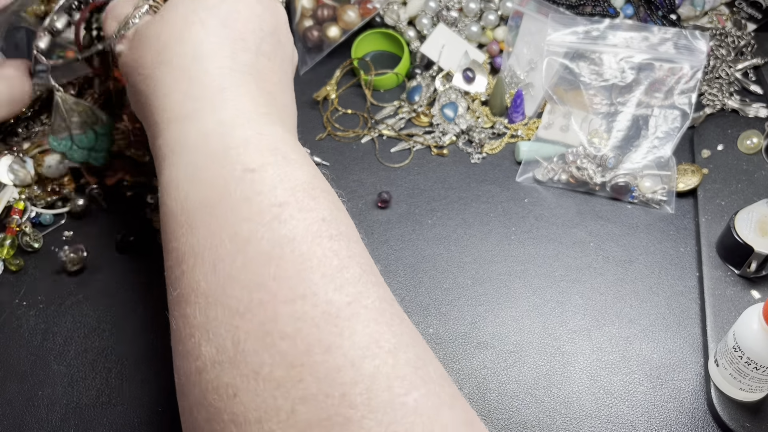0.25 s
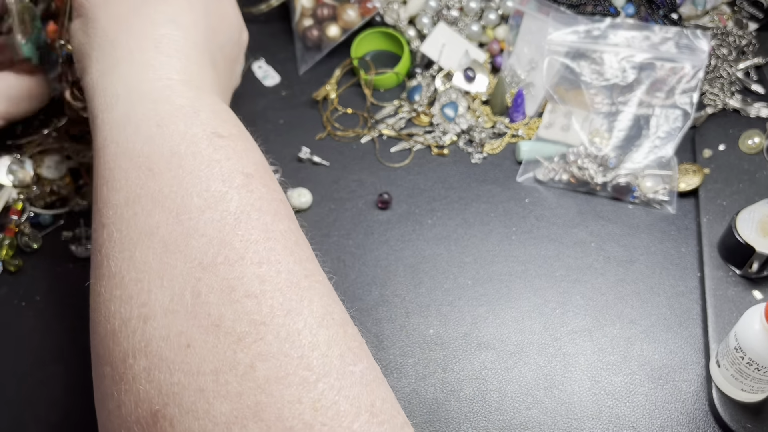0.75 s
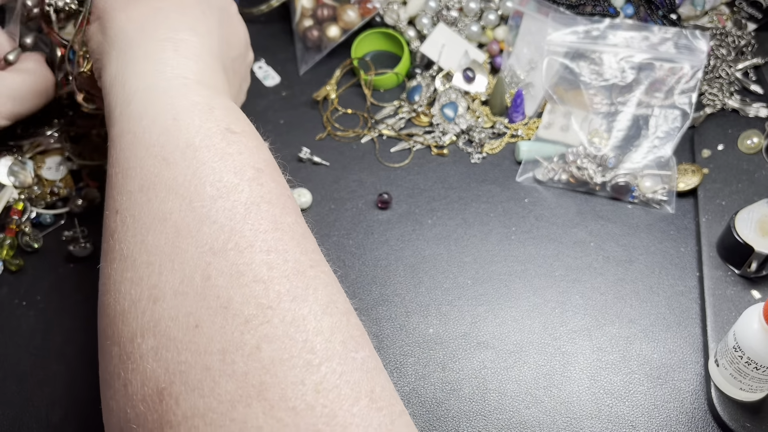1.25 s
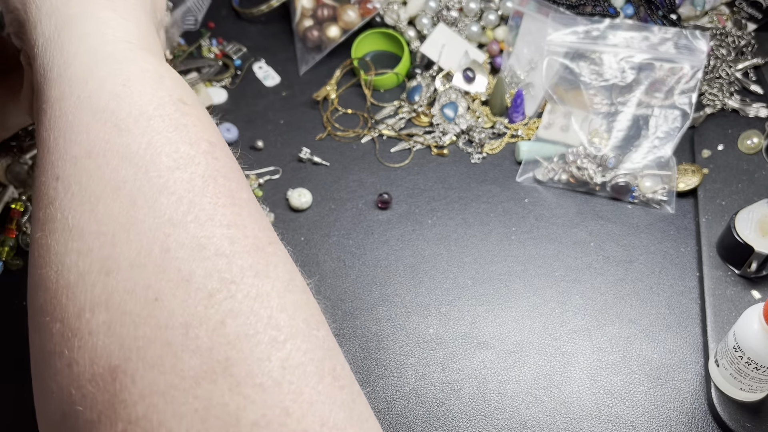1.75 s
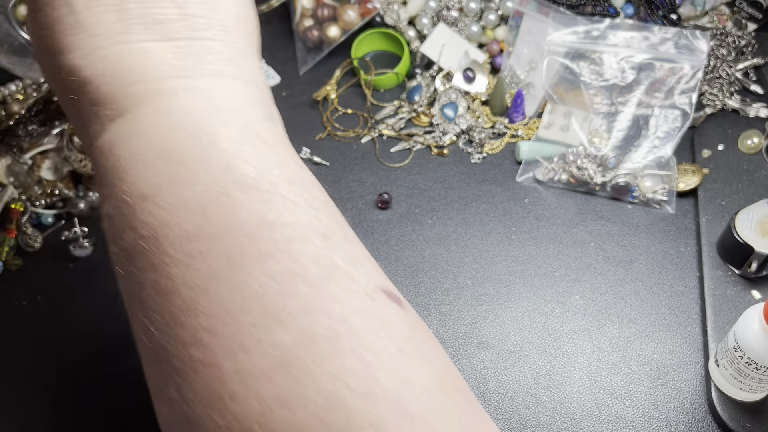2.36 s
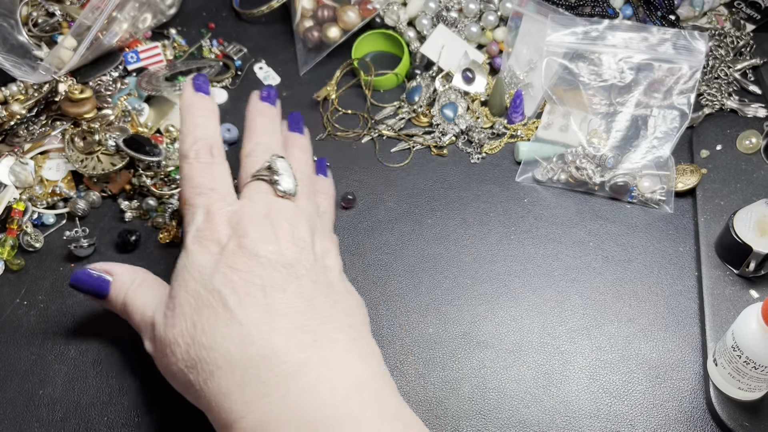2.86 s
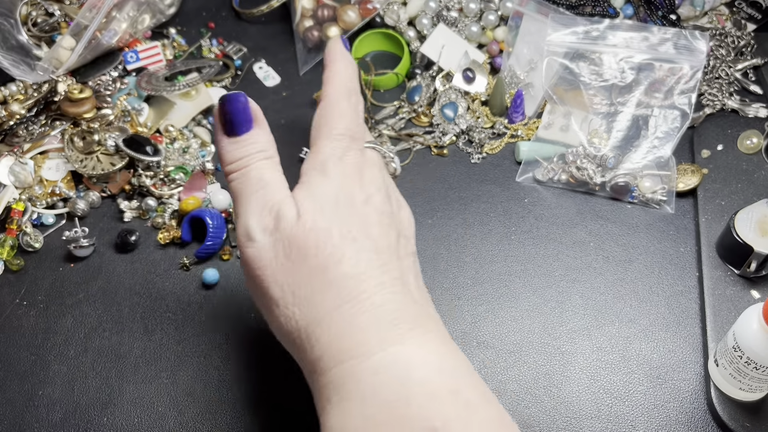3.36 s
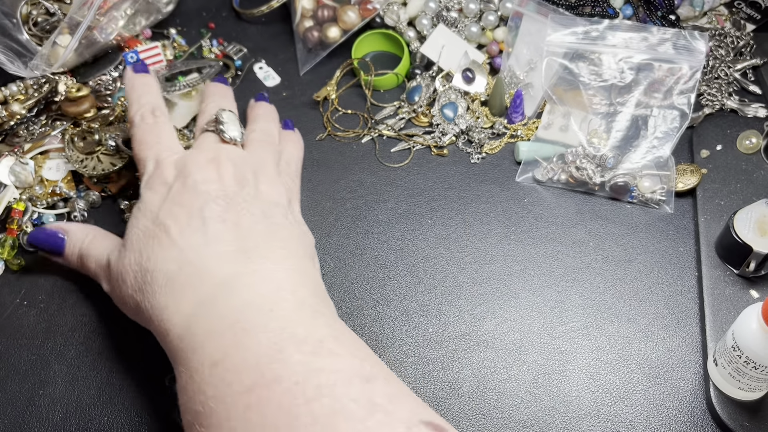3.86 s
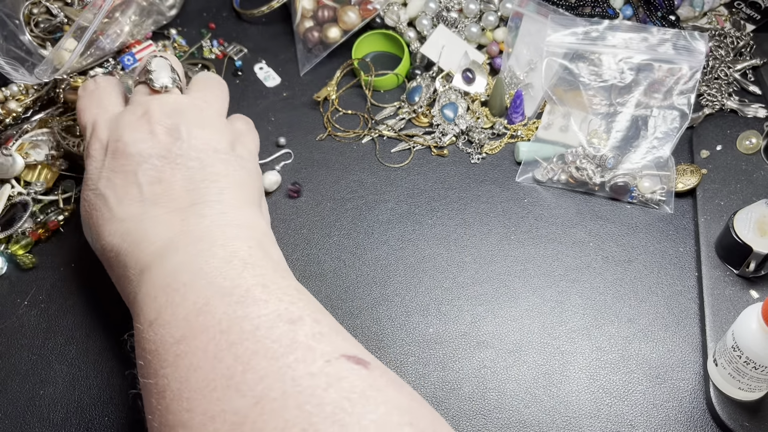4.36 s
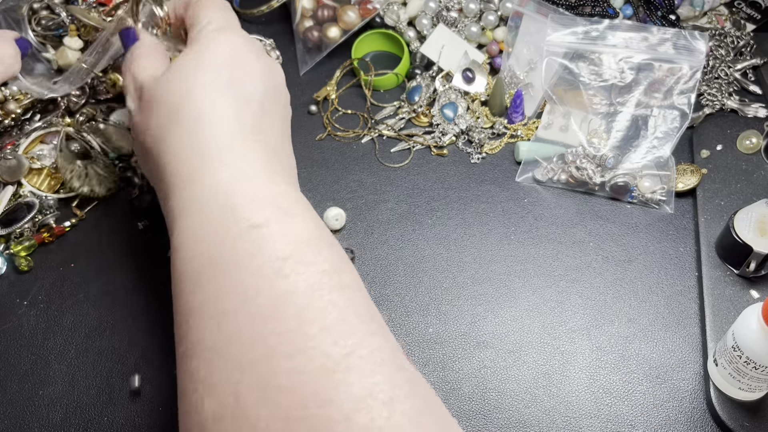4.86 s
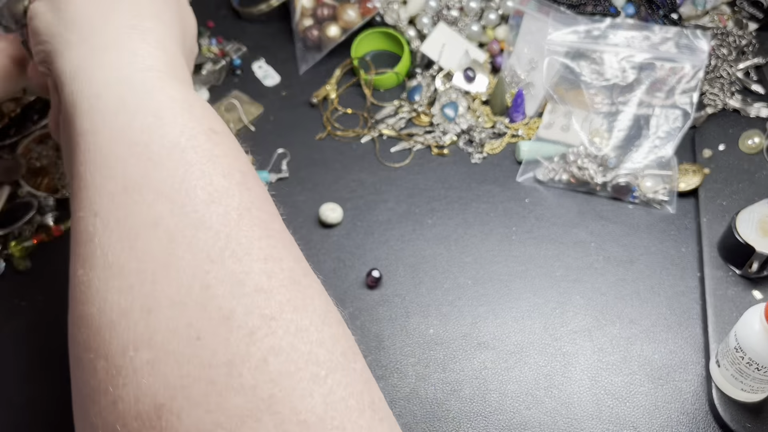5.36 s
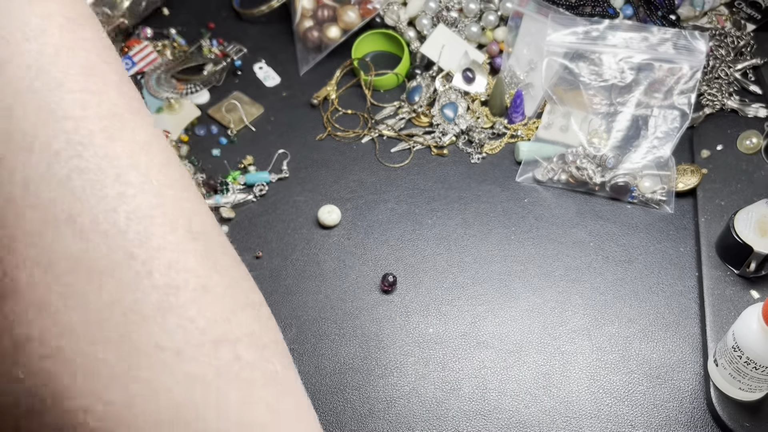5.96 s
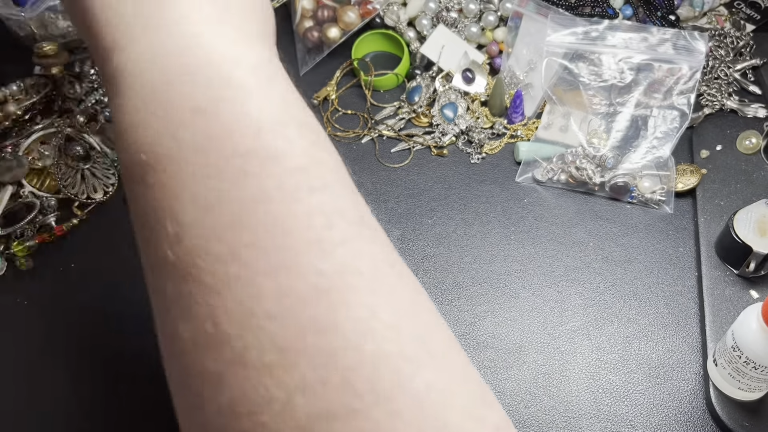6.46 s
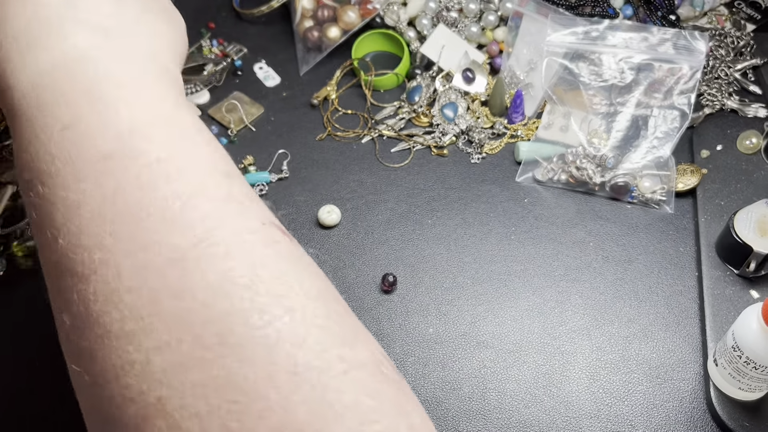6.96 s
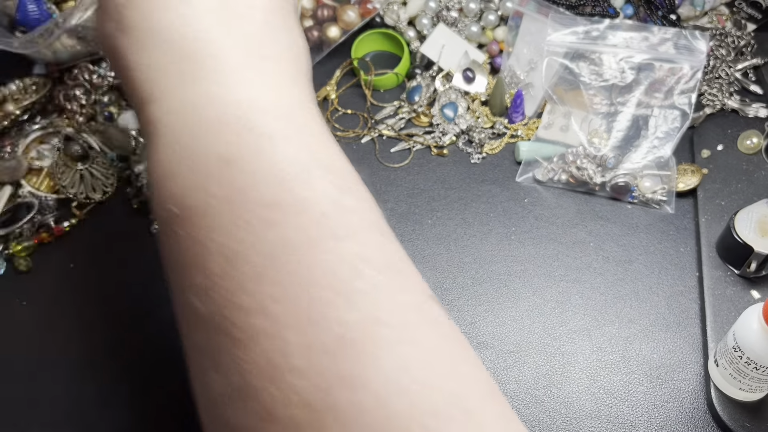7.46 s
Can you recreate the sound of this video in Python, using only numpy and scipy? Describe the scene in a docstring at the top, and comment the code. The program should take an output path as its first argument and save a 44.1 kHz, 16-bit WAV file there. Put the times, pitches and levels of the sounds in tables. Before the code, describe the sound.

Close stereo microphone indoors. A hand stirs a pile of loose jewelry on a padded desk mat: fine chains rustle, plastic beads rattle and charms jingle brightly, strongest before two seconds. A quieter gap follows with faint skin hiss and a soft landing. Raking resumes, swells again to a sharp rattle, then thins to single clacks and clinks over a low room hum.

```python
"""Raking through costume jewelry

A hand rakes through a heap of costume jewelry on a padded desk mat, close to a small stereo microphone.
One effort curve drives rustling chains, rattling beads and jingling charms, as random touches ring modes.
Single pieces clink, clack, snap and chatter as decaying modes and noise bursts; the desk top knocks.
Between handfuls filtered noise hisses as the hand slides over the mat; a low hum and rush fill the room."""
import sys
import numpy as np
from scipy import signal
from scipy.fft import rfft, irfft, next_fast_len
from scipy.io import wavfile
from scipy.ndimage import uniform_filter1d

SR = 44100
rng = np.random.default_rng(int(sys.argv[2]) if len(sys.argv) > 2 else 0)


def waveform_to_disk(signal):
    """Save audio, clipped to [-1, 1], as 16-bit WAV at the path in sys.argv[1]."""
    frames = np.transpose(np.atleast_2d(signal))
    scaled = np.clip(frames, -1, 1) * 32767
    samples = np.round(scaled).astype(np.int16)
    wavfile.write(sys.argv[1], SR, samples)


N = 339570
TIME = np.arange(N) / SR
CUTOFF_HZ = 16100
# woody mode of the desk top: pitch and 60 dB decay time
DESK_HZ, DESK_T60_S = 495.6, 0.037

# spectral density of small metal pieces: [f/Hz, level/dB per Hz]
METAL_SPECTRUM = [(300, -11), (2000, -14.5), (3400, -18.5), (4300, -15), (6500, -8), (9000, -5), (10400, 2),
                  (11300, -6.5), (12500, -16.5), (14000, -22.5), (16000, -35)]
# spectral density of plastic beads: [f/Hz, level/dB per Hz]
BEAD_SPECTRUM = [(60, -9.5), (300, 3), (500, 2.5), (750, -2.5), (1600, -2), (2500, -3), (4000, -7.5),
                 (8000, -0.5), (16000, -81.5)]
# spectral density of fine sliding, skin on the mat or thin chains on each other: [f/Hz, level/dB per Hz]
SLIDING_SPECTRUM = [(1000, -18.5), (3000, -14), (5500, -11), (10500, -7.5), (12000, -15), (16000, -59)]
# how hard the hand stirs, one curve for each rake through the heap: [t/s, level/dB]
RAKE_EFFORTS = [
    [(0.0, -39), (0.2, -42), (0.302, -57), (0.41, -48), (0.462, -40), (0.534, -48), (0.66, -61.5)],
    [(0.66, -56), (0.758, -46), (1.1, -53), (1.37, -39), (1.48, -44), (1.6, -35), (1.88, -32), (2.152, -36),
     (2.22, -50), (2.45, -70)],
    [(3.66, -70), (3.78, -51), (3.99, -39.5), (4.17, -41), (4.28, -37), (4.396, -38), (4.57, -45),
     (4.66, -36), (4.78, -53)],
    [(4.78, -51.5), (4.86, -38), (4.99, -55), (5.07, -36), (5.18, -56), (5.3, -57)],
    [(5.3, -55.5), (5.44, -39), (5.534, -44), (5.62, -35), (5.764, -29), (5.946, -36), (6.18, -59)],
]


def from_db(db):
    """Amplitude ratio: 20 dB is a factor of ten."""
    return 10 ** (np.asarray(db) / 20)


def rms_one(x):
    """Normalisation: the mean power becomes 1."""
    return x / np.sqrt(np.mean(x ** 2) + 1e-20)


def fade(t, t60):
    """Exponential decay: the level falls 60 dB in t60 seconds."""
    return np.exp(-np.log(1000) * t / t60)


def swell(middle_s, length_s):
    """Gaussian envelope: a smooth rise and fall of height 1."""
    return np.exp(-(2 * (TIME - middle_s) / length_s) ** 2 * 2)


def drift(rate):
    """Slow random modulation: normal values of spread 1, `rate` a second, joined by straight lines."""
    knots = rng.standard_normal(2 ** 11)
    return np.interp(TIME * rate % len(knots), np.arange(len(knots)), knots)


def butterworth(x, order, hz, kind="low"):
    """Butterworth filter: passes one side of a corner frequency without ripple."""
    return signal.sosfilt(signal.butter(order, hz, kind, fs=SR, output="sos"), x)


def coloured(x, spectrum):
    """Minimum-phase filtering: folding the cepstrum gives a causal response with the wanted spectrum."""
    size = 2 ** 11
    table_hz, table_db = np.transpose(spectrum)
    bin_hz = np.arange(size // 2 + 1) * SR / size
    gain_db = np.interp(np.log(bin_hz + 1), np.log(table_hz), table_db)
    cepstrum = irfft(np.log(from_db(gain_db)))
    cepstrum[1:size // 2] *= 2
    cepstrum[size // 2 + 1:] = 0
    response = irfft(np.exp(rfft(cepstrum)))
    return signal.fftconvolve(x, response)[:len(x)]


def ring(clicks, hz, t60):
    """Damped resonator: a unit click sets a decaying sine of height 1 ringing."""
    radius = from_db(-60 / (t60 * SR))
    angle = 2 * np.pi * min(hz, SR * .45) / SR
    poles = [1, -2 * radius * np.cos(angle), radius * radius]
    return signal.lfilter([0, np.sin(angle)], poles, clicks + 1e-18)


def contacts(per_s, spread_db, size):
    """Random impact process: touches of either sign, many weak and a few strong."""
    strength = from_db(spread_db * np.minimum(rng.exponential(1, size), 3.5))
    struck = rng.random(size) < per_s / SR
    return struck * strength * rng.choice([-1, 1], size)


def add(out, s, sound):
    """Superposition: mix a sound in at time s."""
    start = max(round(s * SR), 0)
    out[start:start + len(sound)] += sound[:N - start]


def background(apart_db=-20):
    """Steady hum plus broadband rush: both dip briefly, the hum and the bass least."""
    # spectral density of the rush: [f/Hz, level/dB per Hz]
    rush_spectrum = [(20, -27.5), (55, 0), (100, -6.5), (300, -11), (500, -24), (1200, -41), (16000, -61.5)]
    # middles of the brief dips: [t/s]
    dip_times = [2.98, 6.58]
    hum_hz, hum_db, rush_db = 60, -63, -59.5
    dip_s, dip_db, bass_dip_share, bass_below_hz = 0.26, -13, 0.15, 130

    both, left, right = [rms_one(coloured(white, rush_spectrum)) for white in rng.standard_normal((3, N))]
    rush = both + from_db(apart_db) * np.array([left, right])
    bass = signal.sosfiltfilt(signal.butter(2, bass_below_hz, fs=SR, output="sos"), rush)
    hum = from_db(hum_db) * np.sqrt(2) * np.sin(2 * np.pi * hum_hz * TIME)
    dip = from_db(dip_db * sum(swell(s, dip_s) for s in dip_times))
    low = hum + from_db(rush_db) * bass
    high = from_db(rush_db) * (rush - bass)
    return dip ** bass_dip_share * low + dip * high


def stirring(smoothing_s=0.051):
    """Effort envelope in dB against a hard stir: between rakes the heap lies nearly still."""
    # light touches that nudge the last pieces: [t/s, level/dB]
    nudge_effort = [(6.19, -56.5), (6.5, -66.5), (6.6, -96), (6.934, -51), (7.1, -73.5), (7.288, -54),
                    (7.4, -72)]
    hard_stir_db, fidget_db, fidget_per_s = -26, 1.28, 30

    curves = [np.interp(TIME, *np.transpose(rows), left=-130, right=-130)
              for rows in [*RAKE_EFFORTS, nudge_effort]]
    smooth = uniform_filter1d(np.max(curves, axis=0), int(smoothing_s * SR) + 1)
    # the fingers push unevenly
    return smooth - hard_stir_db + fidget_db * drift(fidget_per_s)


def touch_rate(level_db, scale_per_s):
    """Contact density: harder stirring sets more pieces moving at once."""
    return scale_per_s * (0.14 + from_db(.5 * (level_db - level_db.max())))


def loose_pieces(per_s, spread_db, clump_db, low_hz, high_hz, t60, tick, count):
    """Modal excitation: clumped touches tick drily and each rings its own mix of the heap's many modes."""
    clump = from_db(clump_db * np.tanh(drift(70)))
    clicks = contacts(per_s, spread_db, N) / np.sqrt(per_s) * clump
    touches = np.flatnonzero(clicks)
    jitter_hz = rng.uniform(-.5, 0.56, count) * (high_hz - low_hz) / count
    rings = 0
    for hz in np.linspace(low_hz, high_hz, count) + jitter_hz:
        share = np.zeros(N)
        # cubed chance: most touches barely move a given mode, a few move it strongly
        share[touches] = rng.standard_normal(len(touches)) ** 3
        rings = rings + ring(clicks * share, hz, t60)
    return rms_one(rings) + tick * rms_one(clicks)


def rustle(level_db):
    """Dense impacts of small parts: chain links and seed beads slide over each other in short high rings."""
    links = loose_pieces(touch_rate(level_db, 2200), spread_db=4.3, clump_db=6.5,
                         low_hz=3870, high_hz=13560, t60=0.008, tick=0.71, count=56)
    return rms_one(coloured(links, METAL_SPECTRUM))


def rattle(level_db, desk_db):
    """Damped impacts: larger plastic beads jostle on the mat and drive the desk top's woody mode."""
    beads = loose_pieces(touch_rate(level_db, 420), spread_db=2.5, clump_db=6,
                         low_hz=574, high_hz=4634, t60=0.021, tick=0.79, count=32)
    beads = rms_one(coloured(beads, BEAD_SPECTRUM))
    desk = rms_one(ring(beads, DESK_HZ, DESK_T60_S))
    return beads + from_db(desk_db - 15.0) * desk


def jingle(per_s=260, t60=0.036):
    """Lightly damped modes: random touches ring the charms, which take turns to be loud."""
    # ringing modes of the charms: [f/Hz, level/dB]
    charm_modes = [(5733, -12), (7025, -10.5), (7677, -2.5), (7860, -0.5), (8040, -1), (10196, 4),
                   (10632, 0), (10982, -0.5), (12177, -7)]
    spread_db, turns_db = 3, 9

    out = np.zeros(N)
    for hz, db in charm_modes:
        turn = from_db(turns_db * np.tanh(drift(25)))
        out += from_db(db) * ring(turn * contacts(per_s, spread_db, N), hz, t60)
    return rms_one(out)


def heap():
    """Common excitation: one effort moves all; beads stir at a light touch, charms only at a hard one."""
    # what the hand meets on each rake, against the usual mix:
    # [charms level/dB, sliding chains level/dB, beads level/dB, desk level/dB]
    rake_mix = [(7.5, 3, -1, -1.5), (3.5, -9.5, 0.5, -3), (2, 7.5, -2, 7), (-15, -11, -1, 4),
                (-7, -10.5, 2, -6)]
    effort = stirring()
    rake_starts = [rows[0][0] for rows in RAKE_EFFORTS]
    rake = np.maximum(np.searchsorted(rake_starts, TIME) - 1, 0)
    more_charms_db, more_slither_db, more_beads_db, desk_db = np.array(rake_mix)[rake].T

    # level at a hard stir in the usual mix, plus the dB gained for each dB of effort
    chains_db = -24 + 0.8 * effort
    beads_db = -42.5 + 0.5 * effort + more_beads_db
    charms_db = -14 + 2.32 * effort + more_charms_db
    slither_db = -36.5 + 0.97 * effort + more_slither_db

    chains = from_db(chains_db) * rustle(chains_db)
    beads = from_db(beads_db) * rattle(beads_db, desk_db)
    charms = from_db(charms_db) * jingle()
    slither = from_db(slither_db) * rms_one(coloured(rng.standard_normal(N), SLIDING_SPECTRUM))
    return chains + beads + charms + slither


def crack(colour, rise_s, t60):
    """High modal density: the many short-lived modes of a contact merge into a noise burst."""
    t = TIME[:SR // 5]
    # the burst swells in briefly before it decays
    envelope = fade(t, t60) * (1 - np.exp(-t / rise_s))
    burst = coloured(rng.standard_normal(len(t)) * envelope, colour)
    # the energy of 3 ms at rms 1
    return burst / np.sqrt(np.sum(burst ** 2) / (.003 * SR))


def strike(hz, colour, rise_s, ring_t60, ring_db, crack_t60, crack_db):
    """Modal impact: a crack and a cluster of modes round the pitch, of which the pitch rings longest."""
    t = TIME[:SR // 5]
    cluster_hz = hz * rng.uniform(.87, 1.1, (6, 1))
    phases = rng.uniform(0, 2 * np.pi, (6, 1))
    cluster = np.sin(2 * np.pi * cluster_hz * t + phases).sum(0)
    modes = np.sin(2 * np.pi * hz * t) * fade(t, ring_t60) + .5 * cluster * fade(t, ring_t60 / 2)
    ringing = from_db(ring_db) * modes * (1 - np.exp(-t / rise_s))
    return from_db(crack_db) * crack(colour, rise_s, crack_t60) + ringing


def clinks(bounce_per_s=1500, bounce_db=-14, lowest_hz=4800):
    """Impact and settling: a piece strikes or a link snaps free, then its neighbours patter ever more weakly."""
    # metal and glass pieces that strike and ring: [t/s, level/dB, f/Hz]
    ringing_blows = [(0.4236, -17, 7080), (0.4595, -5, 11230), (0.9194, -20.5, 6300), (1.149, -18, 7750),
                     (1.336, -14.5, 10100), (1.4193, -13, 8170), (1.4931, -11, 10900), (1.6392, -9, 10470),
                     (1.662, -5, 9840), (1.738, -13, 7100), (1.7682, -6.5, 7750), (2.296, -34.5, 6560),
                     (2.501, -33, 6690), (5.709, -7.5, 10200), (5.9501, -13.5, 10400), (7.252, -11.5, 6650),
                     (7.2609, -1.5, 10900)]
    # links and clasps that snap past each other, dry and without a note: [t/s, level/dB]
    dry_snaps = [(0.224, -30), (0.392, -29), (0.4914, -21), (0.732, -27.5), (0.763, -22), (1.0332, -27),
                 (1.436, -21.5), (2.028, -20.5), (3.075, -50), (3.09, -46), (3.943, -26), (4.1, -24),
                 (4.607, -25), (4.837, -15), (4.855, -22.5), (5.0, -30.5), (5.381, -33), (5.4229, -19.5),
                 (5.481, -21.5), (5.659, -22), (5.769, -13.5), (5.84, -15.5), (5.881, -18), (5.91, -21),
                 (6.2048, -21), (6.2626, -25), (6.746, -47), (6.964, -34)]
    settle_t60_s = 0.075

    blows = []
    for s, db, hz in ringing_blows:
        blow = strike(hz, METAL_SPECTRUM, rise_s=0.0033, ring_t60=0.024, ring_db=4.5,
                      crack_t60=0.0069, crack_db=-9.0)
        blows.append((s, db, blow))
    for s, db in dry_snaps:
        blows.append((s, db, crack(METAL_SPECTRUM, rise_s=.001, t60=.01)))

    out = np.zeros(N)
    for s, db, blow in blows:
        touches = rms_one(coloured(contacts(bounce_per_s, 7, len(blow)), METAL_SPECTRUM))
        patter = touches * fade(TIME[:len(blow)], settle_t60_s)
        add(out, s, from_db(db) * (blow + from_db(bounce_db) * patter))
    # such small pieces radiate little bass
    return butterworth(out, 2, lowest_hz, "high")


def clacks(rebound_s=.006, rebound_db=-7, lowest_share=0.4, highest_share=3.8, ring_cycles=32):
    """Size sets pitch: beads knock hollowly with a quick rebound, and the hand lands softly."""
    # beads that knock together or on the mat, the larger the lower: [t/s, level/dB, f/Hz]
    bead_knocks = [(0.492, -45, 4450), (0.602, -36, 2440), (0.693, -41, 2150), (0.734, -36.5, 1680),
                   (0.787, -33.5, 2260), (0.82, -32.5, 2150), (0.877, -46, 1480), (1.04, -38.5, 2250),
                   (1.583, -26.5, 980), (2.004, -33, 750), (2.143, -29.5, 810), (2.168, -30, 995),
                   (2.258, -40, 1490), (2.393, -41.5, 737), (2.505, -47.5, 1190), (2.7177, -48.5, 1550),
                   (3.5765, -56, 4460), (3.71, -45.5, 1630), (4.7407, -39, 2560), (4.81, -34, 4030),
                   (5.037, -40.5, 1090), (5.282, -42, 776), (5.422, -24.5, 1470), (5.473, -32.5, 510),
                   (6.205, -38, 820), (6.262, -37, 1710), (6.353, -41, 833), (6.484, -38, 2450),
                   (6.744, -41.5, 2280), (6.809, -42.5, 1360), (6.905, -34.5, 1260), (6.929, -34.5, 790),
                   (7.18, -44.5, 1470), (7.262, -31, 860)]
    # the hand comes down on the mat: [t/s, level/dB, f/Hz]
    hand_landings = [(2.187, -32.5, 180), (3.656, -32.5, 103)]

    out, t = np.zeros(N), TIME[:SR // 5]
    for s, db, hz in bead_knocks:
        rebound = (rebound_s * rng.uniform(.6, 1.6), rebound_db)
        for late_s, loss_db in ((0, 0), rebound):
            blow = strike(hz, BEAD_SPECTRUM, rise_s=0.00023, ring_t60=ring_cycles / hz, ring_db=1,
                          crack_t60=0.019, crack_db=1)
            # a small bead radiates little bass, a large one little treble
            blow = butterworth(blow, 2, lowest_share * hz, "high")
            blow = butterworth(blow, 1, min(highest_share * hz, CUTOFF_HZ))
            add(out, s + late_s, from_db(db + loss_db) * blow)
    for s, db, hz in hand_landings:
        envelope = fade(t, 0.051) * (1 - fade(t, 0.03))
        add(out, s, from_db(db) * np.sin(2 * np.pi * hz * t) * envelope)
    return out


def chatters(touches_per_s=2500):
    """Repeated impacts: a run of tiny touches swells and dies, and keeps one high mode of a charm ringing."""
    # a small bell-like charm chatters against its neighbour: [t/s, peak level/dB, f/Hz]
    charm_runs = [(1.049, -15.5, 10340), (1.826, -10.5, 10700), (1.874, -22.5, 8100), (1.909, -7.5, 10390),
                  (1.98, -21.5, 5690), (2.106, -13, 10360), (5.099, -20, 8980)]
    liveliest_s, ring_t60_s = 0.0065, 0.016

    out, t = np.zeros(N), TIME[:SR // 8]
    run = (t / liveliest_s) ** 2 * np.exp(-2 * t / liveliest_s)
    for s, db, hz in charm_runs:
        note = ring(run * contacts(touches_per_s, 1.6, len(t)), hz, ring_t60_s)
        add(out, s, from_db(db) * note / np.abs(note).max())
    return out


def slides(lowest_hz=1500, catch_db=2.0):
    """Friction noise: skin hisses thinly on the mat, louder the faster it moves, and catches on its grain."""
    # strokes of the hand over the mat, fastest in the middle: [middle t/s, length t/s, level/dB]
    strokes = [(2.5, 0.55, -60), (2.804, 0.27, -53.5), (3.386, 0.43, -60), (6.815, 0.42, -62),
               (7.56, 1, -60)]
    still_hiss_db = -80   # what remains when the hand rests

    speed = sum(from_db(db) * swell(s, length) for s, length, db in strokes) + from_db(still_hiss_db)
    hiss = butterworth(coloured(rng.standard_normal(N), SLIDING_SPECTRUM), 1, lowest_hz, "high")
    return speed * from_db(catch_db * drift(150)) * rms_one(hiss)


def knocks():
    """Plate mode: pieces pressed against the desk top make it give its woody note under the mat."""
    # knocks of the desk top: [t/s, level/dB]
    desk_knocks = [(4.671, -34), (4.837, -35.5), (4.884, -36)]

    out, t = np.zeros(N), TIME[:SR // 5]
    note = np.sin(2 * np.pi * DESK_HZ * t) * fade(t, DESK_T60_S) * (1 - fade(t, 0.0044))
    for s, db in desk_knocks:
        add(out, s, from_db(db) * note)
    return out


def room(x, tail_t60_s=0.28, early_db=-13.0, tail_db=-18):
    """Reflection: early sound reaches both ports alike; scatter and the diffuse tail differ side to side."""
    # scattered sound that reaches each port separately: [f/Hz, level/dB against the direct sound]
    scatter_spectrum = [(250, -17), (700, -12), (1500, -16), (3000, -7), (6500, -12)]

    t = TIME[:SR // 3]
    # the desk and nearby things answer after 1 ms, the room after 4 ms
    early = rng.standard_normal(len(t)) * fade(t, .16) * (t > .001)
    scatter = rms_one(rng.standard_normal((2, len(t))) * fade(t, .02))
    tail = rng.standard_normal((2, len(t))) * fade(t, tail_t60_s) * (t > .004)
    response = from_db(early_db) * rms_one(early) + from_db(tail_db) * rms_one(tail)
    response = response + np.array([coloured(side, scatter_spectrum) for side in scatter])
    return x + signal.fftconvolve(x[None], response / np.sqrt(len(t)), axes=1)[:, :N]


def scene():
    """Superposition: the heap and its single blows in the room, the sliding hand and the background."""
    jewelry = heap() + clinks() + clacks() + chatters() + knocks()
    return background() + room(jewelry) + slides()


def record(dry, treble_hz=13200):
    """Phase lag, soft limiting and roll-off: the right port lags in the treble, peaks round, the top is cut."""
    # phase by which the left port leads: [f/Hz, phase/rad]
    port_phase = [(2000, 0), (4700, 1.0), (4950, 5.3), (5800, 6.2), (8350, 8.9), (9600, 9.7), (16000, 15.9)]
    ceiling = .85   # of full scale

    size = next_fast_len(N + SR // 2, real=True) // 2 * 2
    bin_hz = np.arange(size // 2 + 1) * SR / size
    lag = np.interp(bin_hz, *np.transpose(port_phase))
    right = irfft(rfft(dry[1], size) * np.exp(-1j * lag), size)[:N]
    rounded = ceiling * np.tanh(np.array([dry[0], right]) / ceiling)
    heard = butterworth(rounded, 4, treble_hz)
    return signal.sosfilt(signal.ellip(10, .1, 80, CUTOFF_HZ, fs=SR, output="sos"), heard)


dry = scene()
out = record(dry)
waveform_to_disk(out)
```